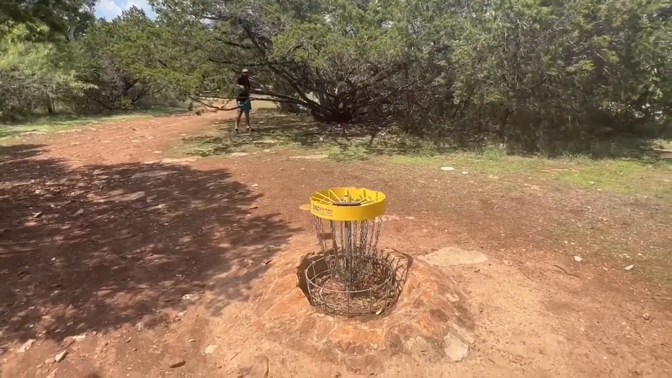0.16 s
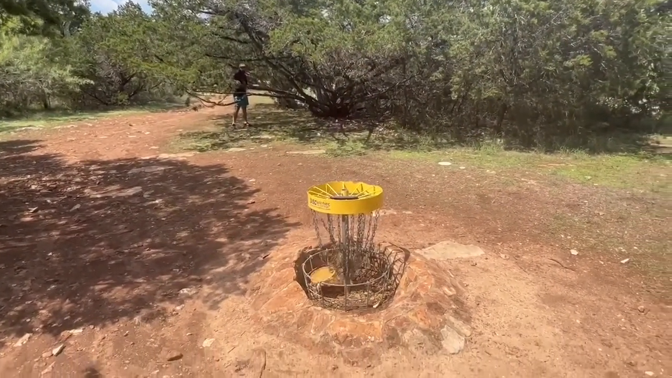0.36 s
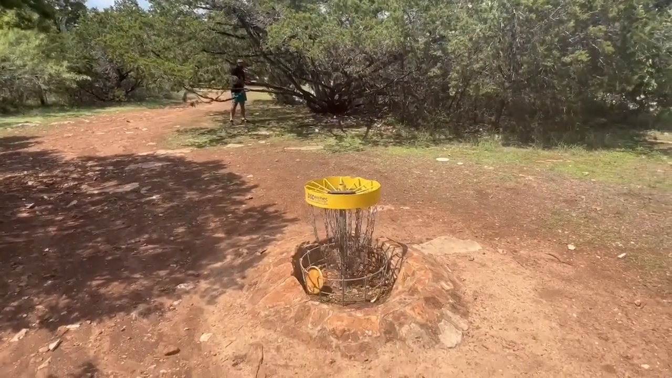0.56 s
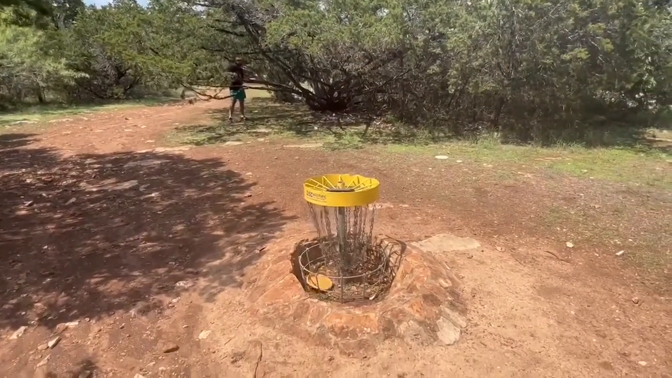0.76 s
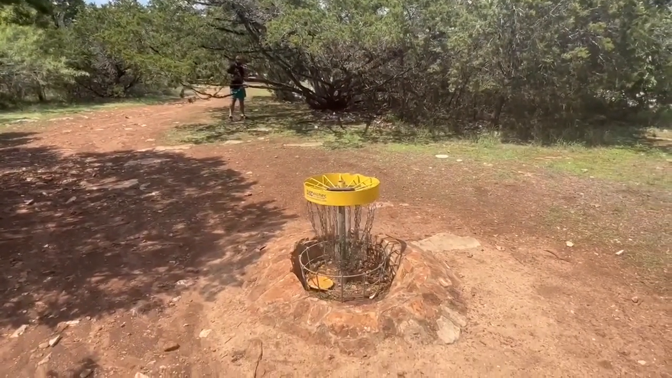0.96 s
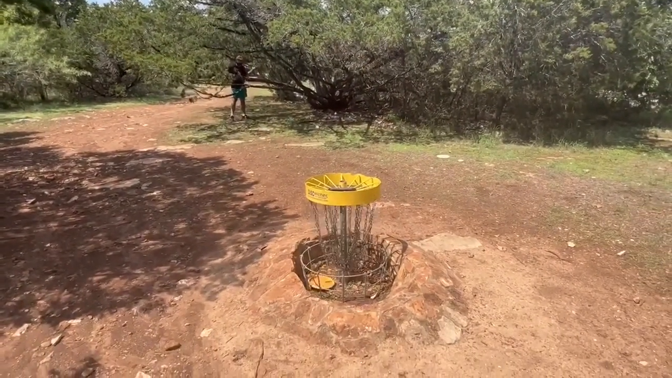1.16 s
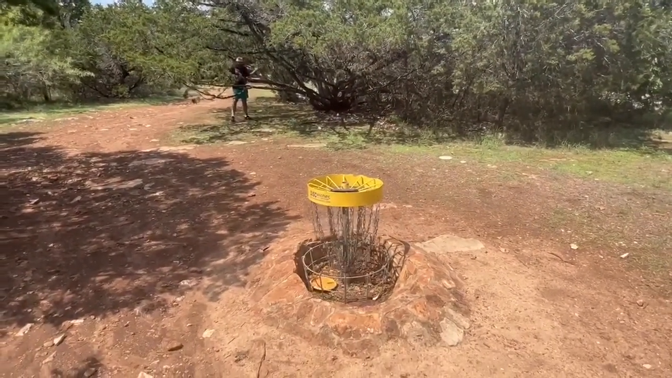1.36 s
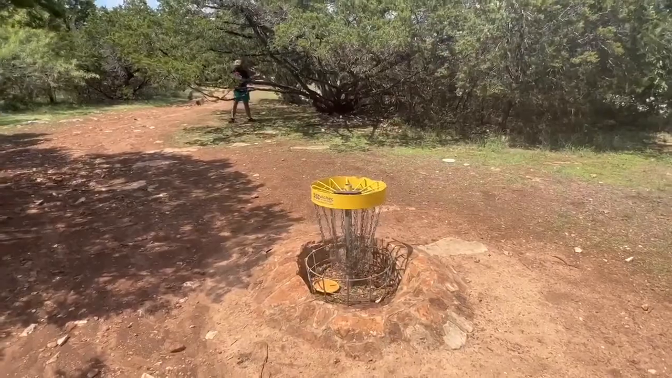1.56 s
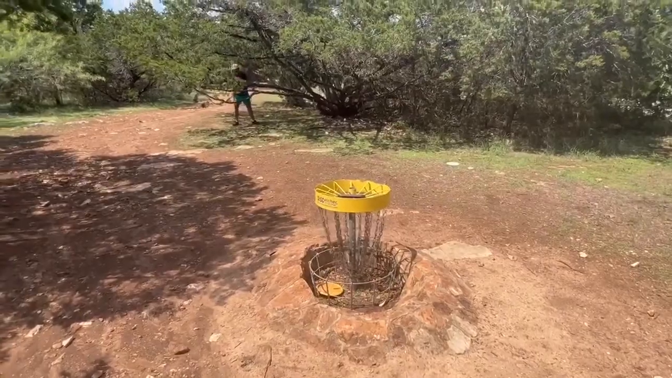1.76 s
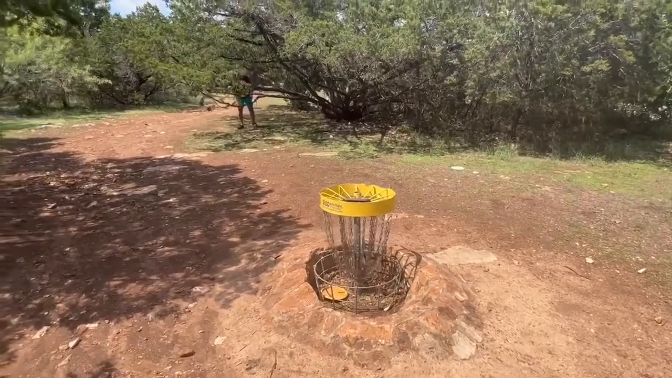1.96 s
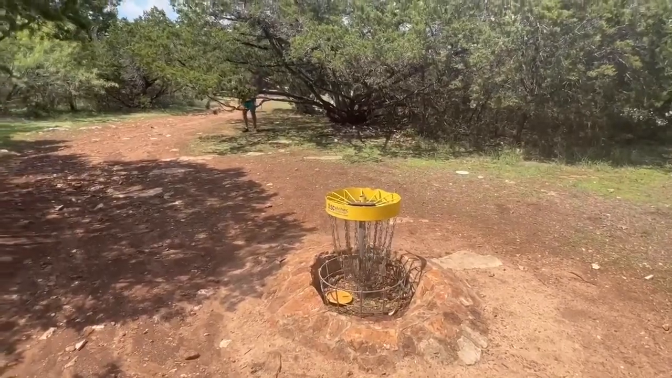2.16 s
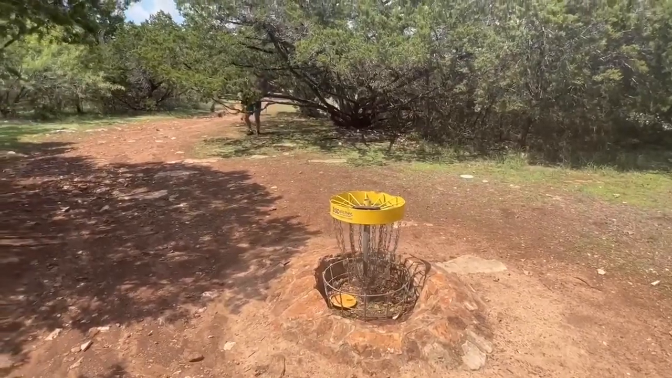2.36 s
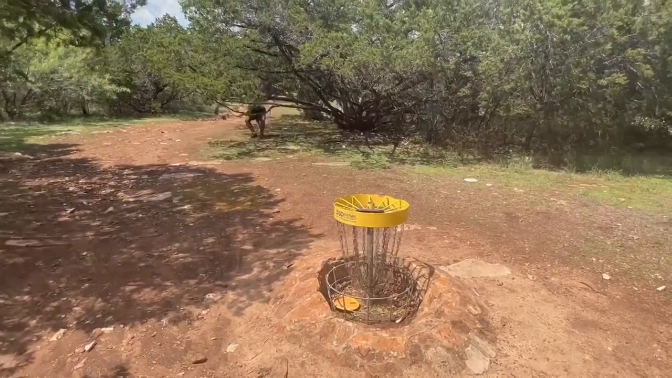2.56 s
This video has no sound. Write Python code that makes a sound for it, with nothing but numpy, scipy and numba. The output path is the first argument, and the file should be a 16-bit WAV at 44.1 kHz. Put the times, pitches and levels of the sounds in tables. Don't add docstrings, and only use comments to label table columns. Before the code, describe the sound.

A plastic disc crashes into the hanging chains of a metal basket, which jangle and settle outdoors

```python
import sys
import numpy as np
from scipy import signal
from scipy.fft import rfft, irfft
from scipy.io import wavfile
from scipy.ndimage import uniform_filter1d
from numba import njit

SR = 44100
rng = np.random.default_rng(int(sys.argv[2]) if len(sys.argv) > 2 else 0)


def decibels_to_gain(level_db):
    exponent = np.asarray(level_db, float) / 20
    return 10 ** exponent


def wav_out(sig):
    wavfile.write(sys.argv[1], SR, np.round(np.clip(np.atleast_2d(sig).T, -1, 1) * 32767).astype(np.int16))


N = 114660
CRASH_S = 0.224

# pitch_hz [Hz], left_over_right_db [dB], right_leads_rad [rad], scatter_rad [rad]
PORTS = [(900, 0.5, 0.64, 0.3), (2500, 0, -1.9, 0.1), (2790, 0.5, 2.1, 2.1), (3400, 7, -8, 1),
         (4160, 9, -1, 1.1), (6010, 8.5, -1.16, 0.89), (9430, -2.5, -5, 1.4), (11600, 0, -1.77, 0.2),
         (17000, 0, 0, .5)]
# pitch_hz [Hz], level_db [dB], fade_60db_s [s]
POLE_TONES = [(4180, -2, 0.15), (4420, 2.5, 0.015), (4627, -0.5, 0.057), (4844, 7.5, 0.014),
              (4967, -1.5, 0.051), (5540, -10.5, 0.1), (5570, -5, 0.058), (5950, -7, 0.2),
              (6490, -4, 0.074), (2760, -9, 0.086)]
# pitch_hz [Hz], level_db [dB], fade_60db_s [s]
TRAY_TONES = [(230, -10.5, .05), (357, -17.5, 0.031), (669.7, -3.5, 0.031), (778.7, -14.5, 0.089),
              (1186, -13, 0.056), (1286, -3.5, 0.045), (1484.5, 2, 0.02), (1858, -3, 0.027),
              (2044, -6.5, 0.04), (2207, -4.5, 0.014)]


def read(table, hz, column=1):
    table = np.array(table, float)
    return np.interp(np.log(hz), np.log(table[:, 0]), table[:, column])


def walk(rate):
    hold = int(SR / rate)
    steps = rng.standard_normal(size=2000)[np.arange(N) // hold]
    return 0.98 * uniform_filter1d(uniform_filter1d(steps, hold), hold)


def noise(colour, db, width):
    hz = np.maximum(np.arange(N // 2 + 1) * SR / N, 1)
    spectrum = rfft(rng.standard_normal((2, N))) * decibels_to_gain(read(colour, hz))
    mid, side = irfft(spectrum, N)
    return decibels_to_gain(db) / np.std(mid) * (mid + width * side * np.array([[1], [-1]]))


def outdoors():
    # pitch_hz [Hz], level_db [dB per Hz]
    air_colour = [(88, -49.5), (150, -1), (226, -15), (275, -12), (689, -12.5), (960, -11.5), (1600, -17.5),
                  (2600, -31.5), (16000, -45.5)]
    # pitch_hz [Hz], level_db [dB per Hz]
    wind_colour = [(12, -42), (20, -12.5), (39, -1), (59, 7), (112, 3.5), (220, -19), (290, -39.5),
                   (480, -120)]
    # time_s [s], gust_db [dB]
    gusts = [(0, -63), (.5, -60.5), (0.951, -61.5), (1.15, -60), (1.35, -58.5), (1.62, -58), (1.75, -59),
             (2.6, -62)]
    time_s, gust_db = np.array(gusts).T
    gust = np.interp(np.arange(N) / SR, time_s, gust_db - gust_db.mean())
    hush = noise(air_colour, -66.5, width=0.4) * decibels_to_gain(0.5 * walk(12))
    wind = noise(wind_colour, -58.5, width=0.85) * decibels_to_gain(gust + 3 * walk(16))
    return hush + wind


@njit
def ring(start, hz, t60, left, right, rise, n, sr):
    out = np.zeros((2, n))
    for k in range(len(start)):
        turn = np.exp(2j * np.pi * hz[k] / sr - np.log(1000.) / (t60[k] * sr))
        tone = 1. + 0j
        rise_step = np.exp(-1 / (rise[k] * sr))
        unrisen = 1.
        for i in range(start[k], min(n, start[k] + int(.8 * t60[k] * sr))):
            out[0, i] += (left[k] * tone).imag * (1 - unrisen) ** 2
            out[1, i] += (right[k] * tone).imag * (1 - unrisen) ** 2
            tone *= turn
            unrisen *= rise_step
    return out


def strike(s, hz, t60, db):
    s, hz, t60, db = (np.ravel(v) * 1. for v in np.broadcast_arrays(s, hz, t60, db))
    tilt = read(PORTS, hz) / 2
    phase = read(PORTS, hz, column=2) + read(PORTS, hz, column=3) * rng.standard_normal(len(s))
    start = np.clip(s * SR, 0, N).astype(np.int64)
    left = decibels_to_gain(db + tilt) + 0j
    right = decibels_to_gain(db - tilt) * np.exp(1j * phase)
    rise_s = 0.00011 + 0.77 / hz
    return ring(start, np.clip(hz, 20, SR / 2.2), np.maximum(t60, 1e-3), left, right, rise_s, N, 1. * SR)


def burst(s, db, length_s, count):
    u = rng.random((len(s), count)) ** 2
    u[:, 0] = 0
    times = s[:, None] + u * length_s
    levels = db[:, None] - 12 * u - 5 * np.exp(-u / 0.12)
    return times.ravel(), levels.ravel()


def body(s, db, tones, detune, first_db=0.):
    hz, tone_db, t60 = np.array(tones).T
    chance = rng.standard_normal(size=(len(s), 2, len(hz)))
    db = db[:, None] + tone_db + 5 * chance[:, 1]
    db[:, 0] += first_db
    return strike(s[:, None], hz * (1 + detune * chance[:, 0]), t60, db)


def crack(s, db, count):
    # pitch_hz [Hz], level_db [dB]
    crack_colour = [(150, -22), (1290, -19), (2400, -14.5), (5000, -11.5), (7000, -14), (9500, -11),
                    (12500, -12), (15500, -21)]
    hz = 150 * 105 ** rng.random((len(s), count)) ** .5
    hz = np.minimum(hz, 15900)
    level = db[:, None] + read(crack_colour, hz) + 10 * np.log10(hz / 1000)
    return strike(s[:, None], hz, 20 / hz + 0.024, level)


def crash():
    length_s, fade_60db_s = 0.06, 0.067
    late = rng.exponential(size=300) * length_s
    db = -31 - 60 * np.maximum(late - length_s, 0) / fade_60db_s
    return crack(CRASH_S + late, db, count=12)


def swing(rate, count):
    # time_s [s], level_db [dB]
    swing_level = [(.23, -23), (.3, -25.5), (0.421, -34.5), (.6, -41), (.7, -32.5), (.9, -43), (1.1, -50),
                   (1.4, -50), (1.55, -48.5), (1.66, -66), (1.78, -73), (1.9, -61), (2.099, -62),
                   (2.55, -80.5)]
    thins_s = 0.7
    time_s, level_db = np.array(swing_level).T
    gap, size = rng.exponential(size=(count, 2)).T
    s = CRASH_S + thins_s * np.expm1(np.cumsum(gap) / rate / thins_s)
    clump_db = 4 * walk(59.95)[np.minimum(s * SR, N - 1).astype(int)]
    return s, np.interp(s, time_s, level_db) + clump_db + 3.5 * np.minimum(size, 3)


def shaken_cage():
    s, db = swing(500, count=700)
    pole = body(s, db - 26.5, POLE_TONES, detune=0.027)
    tray = body(s, 0.35 * db - 39, TRAY_TONES, detune=0.033)
    return pole + tray


def links(s, db, low_db):
    link_pitch = [9280, 11800, 12860, 13780, 14720, 8150]
    # spread_between_links_hz [Hz], level_db [dB], fade_60db_s [s]
    link_tones = [(173, -4, 0.035), (103, 2, 0.066), (132.5, -7, 0.14), (148.7, -11, 0.089),
                  (199, -13, 0.057), (250, -32, 0.1)]
    hz = np.array(link_pitch)
    spread, tone_db, t60 = np.array(link_tones).T
    chance = rng.standard_normal(size=(len(s), 4, len(hz)))
    tune, far, weight, damp = np.swapaxes(chance, 0, 1)
    db = db[:, None] + tone_db + 4 * weight + np.outer(low_db, hz < 1e4)
    hz = hz + spread * tune * np.abs(far)
    return strike(s[:, None], hz, t60 * decibels_to_gain(5 * np.clip(damp, -2, 1.5)), db)


def rattle():
    s, db = swing(1700, count=1800)
    return links(s, db - 11.5, 0 * s) + crack(s, db - 12, count=5)


def tray_knocks():
    # start_s [s], peak_db [dB], thump_db [dB]
    tray_hits = [(0.226, -12, -24), (0.235, -12.5, -19), (0.246, -15, -18.5), (0.262, -20, -27),
                 (0.278, -21.5, -8), (0.299, -25, -14.5), (0.392, -26, -15), (0.422, -34, -21),
                 (0.472, -32.5, -12.5), (0.445, -38, -25), (0.504, -37, -8.5), (0.529, -57, -11),
                 (0.67, -34.5, -9), (0.737, -46, -13), (0.76, -20.5, -34), (0.768, -51, -33),
                 (0.817, -34, -12.5), (0.87, -41.5, -16), (0.927, -39.5, -20), (0.57, -43.5, -16),
                 (0.613, -34.5, -18.5), (1.25, -48, -30), (1.268, -45, -19), (0.962, -36, -40),
                 (1.419, -41, -32), (1.841, -31, -15.5), (1.854, -43.5, -42), (1.885, -38.5, -16),
                 (2.035, -50, -15), (2.21, -45, -9), (2.336, -50, -19)]
    s, db, thump_db = np.array(tray_hits).T
    thump_hz = np.array([70, 121.5, 199.4, 305])
    thump_t60 = np.array([0.076, 0.067, 0.058, 0.043])
    thump = strike(s[:, None], thump_hz, thump_t60, (db + thump_db)[:, None] + 6.5)
    s, db = burst(s, db, 0.011, count=4)
    return thump + body(s, db - 6.5, TRAY_TONES, detune=0.04)


def pole_slaps():
    # start_s [s], peak_db [dB], first_tone_db [dB]
    pole_hits = [(0.228, -10.5, -10), (0.242, -1.5, -10), (0.286, -11, 0), (0.344, -24.5, -8),
                 (1.718, -42, -9), (0.2656, 0.5, 6), (0.314, -15.5, 12), (0.4288, -30, -2),
                 (0.4742, -22, 1), (0.546, -22, -11), (0.572, -23.5, -1.5), (0.662, -27.5, -11),
                 (0.671, -9.5, -8), (0.7371, -14.5, 4.5), (0.752, -17, -14), (0.766, -21.5, -18),
                 (0.9207, -24.5, -8), (1.0903, -27.5, -18), (1.1573, -27.5, 0), (1.185, -34.5, 3.5),
                 (1.222, -26.5, 0), (1.2508, -29.5, 8), (1.2649, -27.5, 1), (1.2973, -28, -8),
                 (1.429, -21, 2), (1.4583, -25.5, -3), (1.547, -50, -10), (1.5741, -34, -0.5),
                 (1.654, -42, -21), (1.805, -35, -4), (1.8453, -39.5, -10.5), (1.885, -43.5, -7),
                 (2.0337, -51.5, -6), (2.1743, -52.5, -12), (2.2108, -43.5, -11), (2.2395, -35, -7),
                 (2.325, -49.5, -14.5), (2.337, -45.5, -9)]
    count = 6
    s, db, first_db = np.array(pole_hits).T
    s, db = burst(s, db, 0.015, count)
    tones = body(s, db - 22.5, POLE_TONES, detune=0.009, first_db=np.repeat(first_db, count))
    return tones + crack(s, db - 17, count=14)


def clinks():
    # start_s [s], peak_db [dB], low_tones_db [dB]
    link_hits = [(0.2498, -8, -13), (0.4838, -16, -16), (0.518, -38, -25), (0.5425, -41, -24),
                 (0.5665, -42, -18), (0.605, -26.5, -11), (0.6245, -19.5, -12), (0.631, -13.5, -9.5),
                 (0.6494, -23, -23), (0.6624, -17, -14.5), (0.673, -12.5, -6.5), (0.6905, -22, -12.5),
                 (0.806, -28.5, -4.5), (0.823, -19.5, -10), (0.8462, -21, -23), (0.8929, -21.5, -28),
                 (0.9621, -19.5, -5.5), (1.0142, -43, -21), (1.04, -36.5, -3), (1.054, -33, -19),
                 (1.076, -28, -19), (1.09, -20.5, -1.5), (1.1474, -25, -15), (1.2005, -26.5, -32),
                 (1.2507, -24.5, -11.5), (1.2695, -37, -15), (1.2979, -23.5, -9), (1.3379, -34, 0.5),
                 (1.4237, -27, 2.5), (1.4592, -35, 2.5), (1.509, -30.5, -9), (1.5738, -30, -16),
                 (1.6562, -32.5, -11), (1.714, -55, 3), (1.8063, -40, -18), (1.8649, -43, -3.5),
                 (1.8966, -44, -14), (1.9596, -38.5, -12), (1.9824, -45.5, -1), (2.0345, -43, -10),
                 (2.0477, -37, -5.5), (2.1092, -56, -20), (2.1405, -54, -18), (2.174, -38.5, -15),
                 (2.2096, -39, -11), (2.3282, -46, -4.5), (2.3378, -49, -13), (2.4294, -60, -9.5),
                 (2.5042, -61.5, -24)]
    count = 8
    s, db, low_db = np.array(link_hits).T
    s, db = burst(s, db - 12.5, 0.013, count)
    return links(s, db, np.repeat(low_db + 12, count)) + crack(s, db - 11.5, count=12)


def birds():
    # start_s [s], length_s [s], start_hz [Hz], end_hz [Hz], level_db [dB], octave_db [dB]
    calls = [(.55, .05, 2720, 2745, -46, -25), (.63, .03, 4880, 4855, -42, -30),
             (.86, .04, 3500, 3520, -56, -25), (.97, .06, 3250, 3180, -59, -25),
             (1.7, .075, 3090, 3125, -54, -13), (1.71, .07, 2900, 2880, -60, -2),
             (1.75, .05, 2660, 2640, -64, -12), (2.05, .07, 3890, 3910, -62, -35),
             (2.1, .05, 3630, 3620, -69, -30), (2.12, .04, 4300, 4450, -70, -30),
             (2.25, .09, 3270, 3330, -67, -25)]
    out = np.zeros((2, N))
    t = np.arange(N) / SR
    for s, length_s, start_hz, end_hz, db, octave_db in calls:
        u = np.clip((t - s) / length_s, 0, 1)
        hz = start_hz + (end_hz - start_hz) * u + 53 * walk(250)
        phase = 2 * np.pi * np.cumsum(hz) / SR
        whistle = np.sin(phase) + decibels_to_gain(octave_db) * np.sin(2 * phase)
        tilt = read(PORTS, start_hz) / 2 * np.array([[1], [-1]])
        out += decibels_to_gain(db + 2.5 + tilt + 4.0 * walk(200)) * np.sin(np.pi * u) ** 0.35 * whistle
    return out


def echoes(near):
    t = np.arange(int(.4 * SR)) / SR
    echo = rng.standard_normal((1, len(t))) * decibels_to_gain(-60 * t / 0.16) * (t > .004)
    echo *= decibels_to_gain(-13) / np.sqrt(np.sum(echo ** 2, axis=1, keepdims=True))
    return signal.fftconvolve(near, echo, axes=1)[:, :N]


def scene():
    air = outdoors()
    basket = crash() + shaken_cage() + tray_knocks() + pole_slaps()
    chains = rattle() + clinks()
    near = basket + chains + birds()
    return air + near + echoes(near)


def roll_off(x):
    return signal.sosfilt(signal.butter(12, 16360, fs=SR, output="sos"), x)


def record(dry):
    # pitch_hz [Hz], width_hz [Hz], depth_db [dB]
    body_dips = [(3270, 130, -14), (7580, 110, -18), (10780, 330, -24)]
    top_hz, ceiling = 15450, 0.85
    hz = np.arange(N // 2 + 1) * SR / N
    db = sum(depth * np.exp(-((hz - dip_hz) / width) ** 2) for dip_hz, width, depth in body_dips)
    db = db - np.clip((hz - top_hz) / 12, 0, 60)
    heard = irfft(rfft(dry) * decibels_to_gain(db), N)
    return roll_off(ceiling * np.tanh(heard / ceiling))


dry = scene()
out = record(dry)
wav_out(out)
```